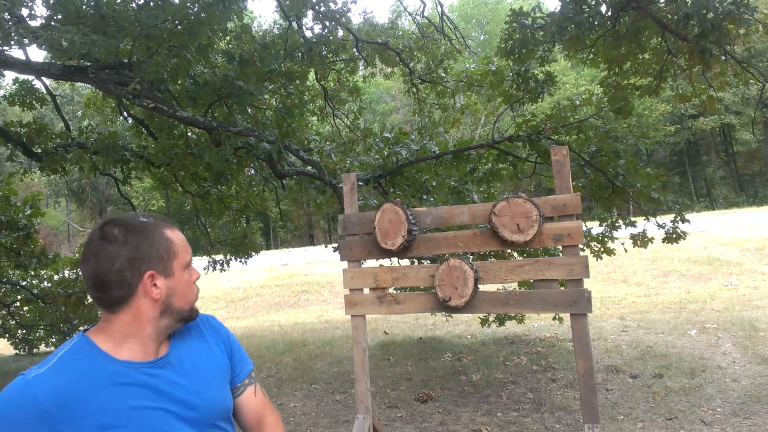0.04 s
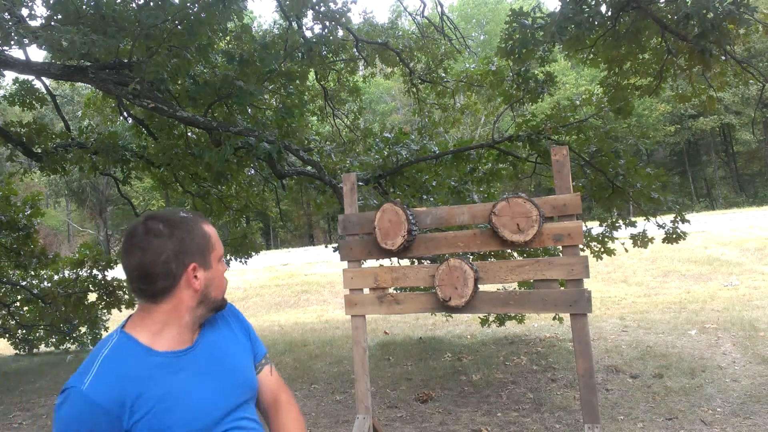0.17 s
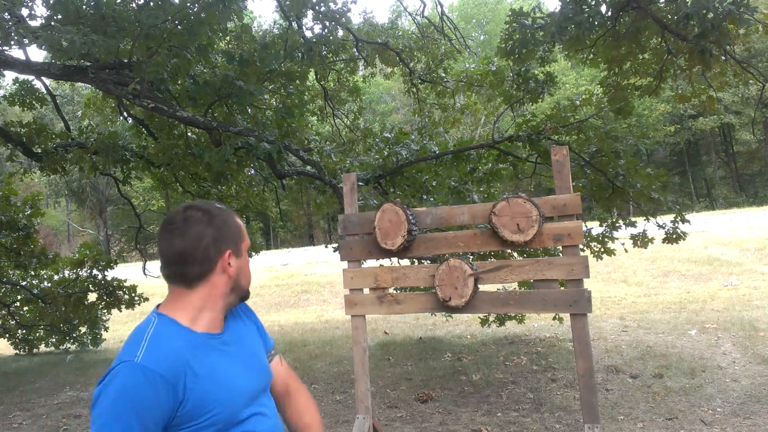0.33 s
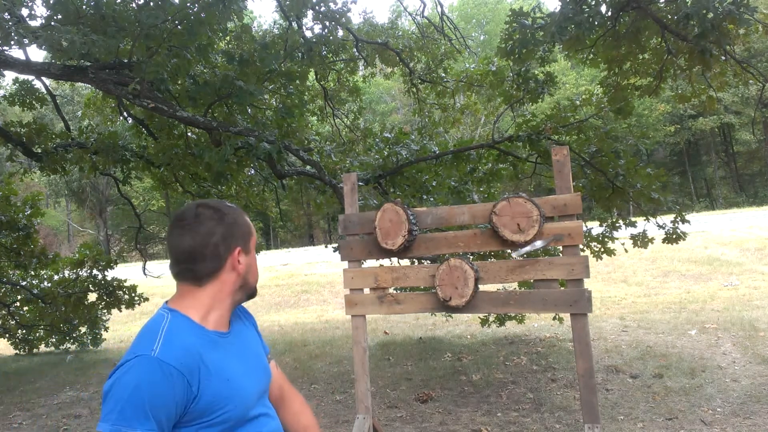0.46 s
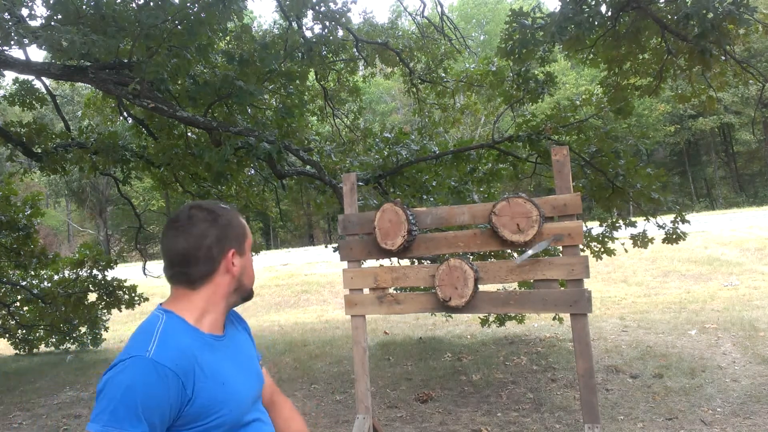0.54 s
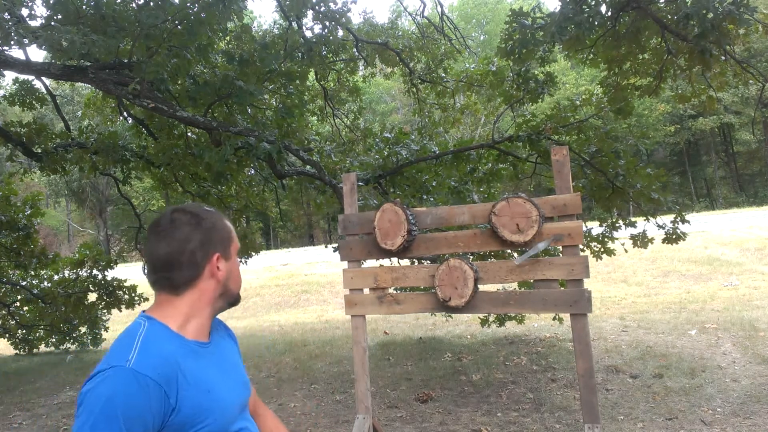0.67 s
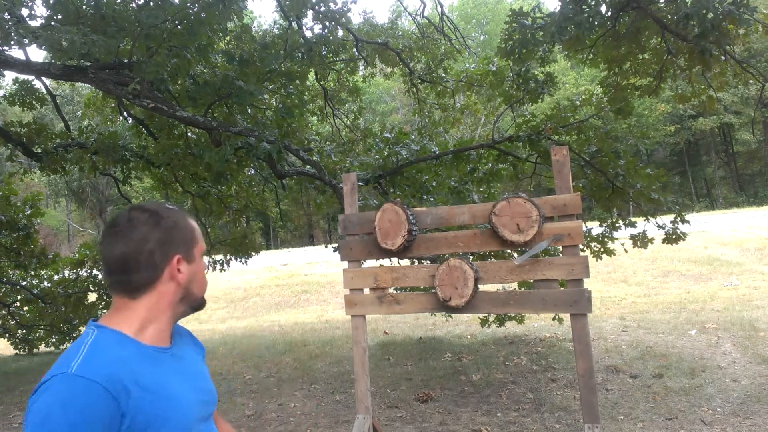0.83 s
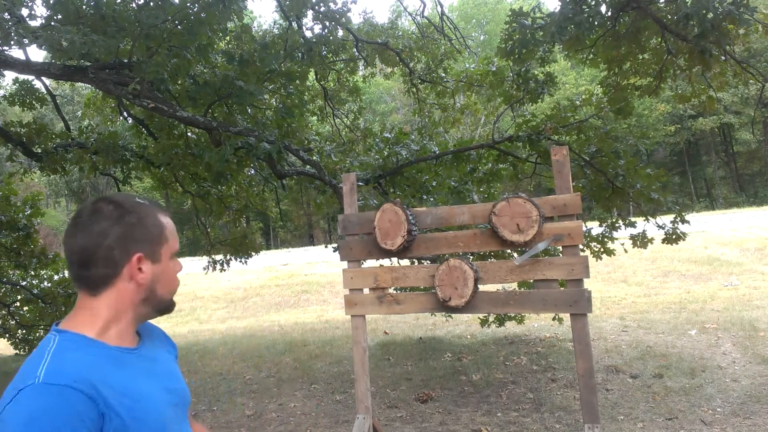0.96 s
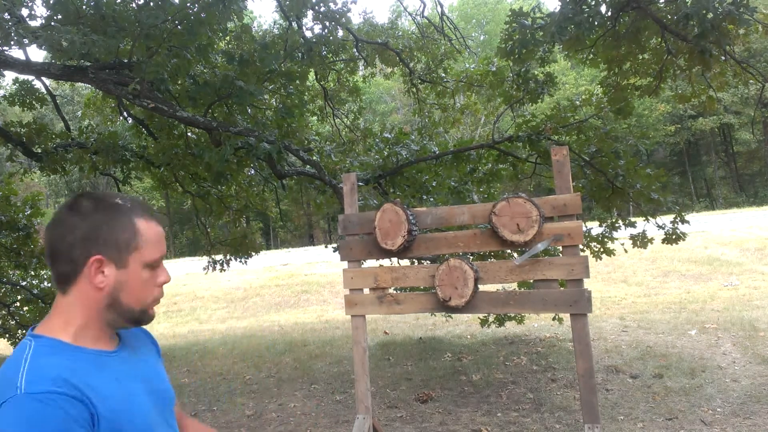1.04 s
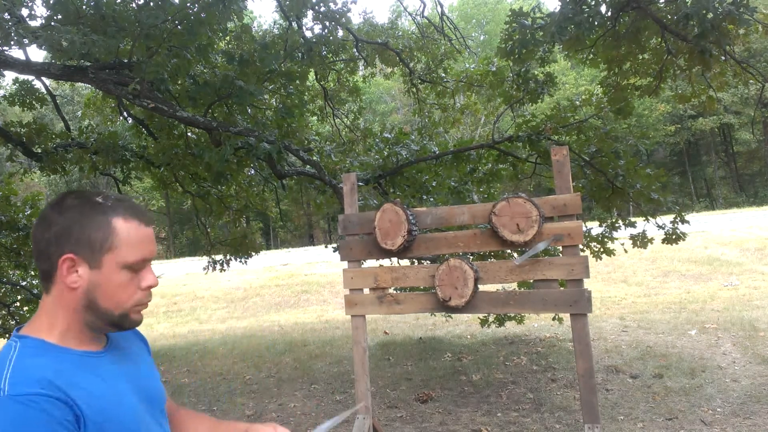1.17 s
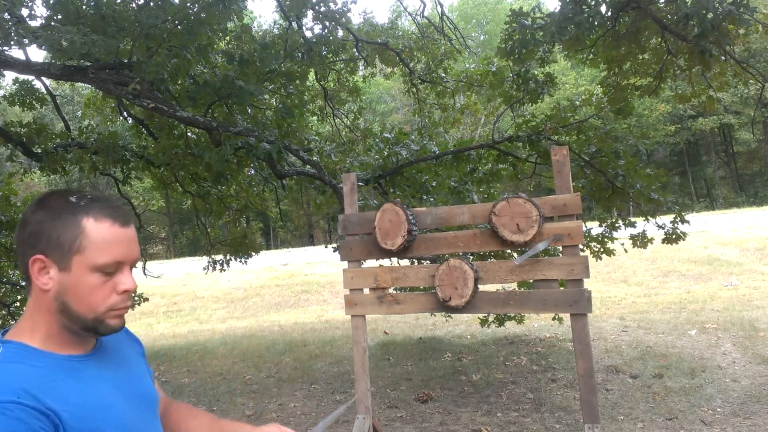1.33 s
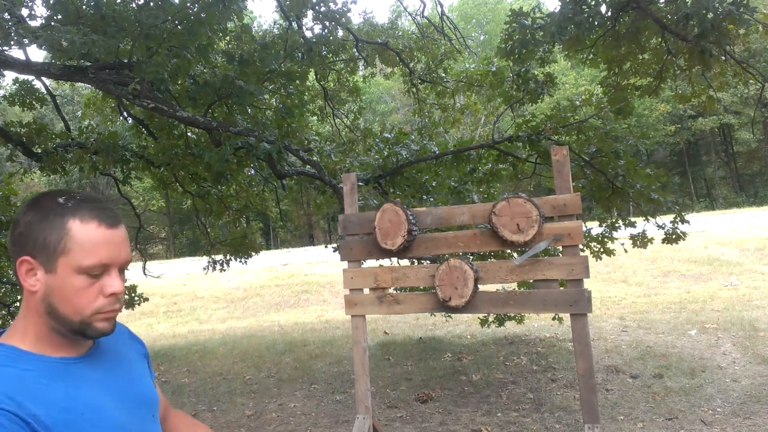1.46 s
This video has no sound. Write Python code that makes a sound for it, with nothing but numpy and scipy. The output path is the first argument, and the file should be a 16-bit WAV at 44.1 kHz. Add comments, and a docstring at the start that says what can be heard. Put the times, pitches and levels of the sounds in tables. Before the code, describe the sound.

Outdoors under trees, a steel knife strikes a wooden board with a sharp knock that rattles loose planks. Then, near the microphone, steel slides on steel with a short, quieter ring as another knife is drawn.

```python
"""A steel throwing knife thuds into a plank target under trees, heard on a stereo pair of microphones.
The point ticks, board and blade ring, loose planks clatter and the trees echo.
Close by, the next knife is drawn off the stack in the hand: steel scrapes on steel and the blades ring.
Behind it all lie a thin outdoor hiss and a low rumble."""
import sys
import numpy as np
from scipy import signal
from scipy.fft import rfft, irfft
from scipy.io import wavfile

SR = 44100
rng = np.random.default_rng(int(sys.argv[2]) if len(sys.argv) > 2 else 0)


def log_audio(samples):
    """Write samples as a 16-bit WAV file to the path given in sys.argv[1]."""
    # one column per channel
    frames = np.atleast_2d(samples).T
    # limit to full scale, then quantise
    limited = np.clip(frames, -1, 1)
    pcm = np.round(limited * 32767).astype(np.int16)
    wavfile.write(sys.argv[1], SR, pcm)


N = 66150

# colour of the open air (f/Hz, relative level/dB)
AIR_COLOUR = [(25, -8), (50, -5.5), (85, 2), (130, 3.5), (200, 2), (270, 1.5), (400, -3), (900, -5),
              (2500, -8.5), (4500, -5), (5600, -8), (7000, -15.5), (8500, -18), (10500, -22.5)]
# the air across the pair (f/Hz, left-right likeness, L-R/dB)
AIR_STEREO = [(59.6, -0.5, 6.5), (300, -0.25, -2), (600, -0.037, -2), (1900, 0.18, -2), (3430, -0.082, 4),
              (6000, -0.21, 8.5), (9940, 0.065, -4.5)]
# faint high tones in the background (f/Hz, level/dB)
WHINE_TONES = [(4215, -85.5), (4581, -82), (4947, -84), (5862, -82), (6600, -97)]
# steel ringing just after the throw (f/Hz, level/dB, t60/s, L-R/dB)
FLIGHT_MODES = [(3990, -69.5, 0.96, 6), (7770, -66, 0.38, -2.5), (9350, -69.5, .45, -6.5)]
# knives shifting in the hand (peak t/s, rise/s, fall/s, level/dB, centre f/Hz, spread/octaves)
HAND_RUBS = [(.008, 0.0064, 0.044, -62, 3180, 2.4), (.405, 0.015, 0.046, -64.5, 8300, 0.65),
             (.74, 0.046, 0.14, -73, 9000, 0.29), (0.876, 0.037, 0.011, -61, 7250, 1.23),
             (1.07, 0.035, 0.056, -67.5, 6960, 0.77)]
# colour of steel scraping steel (f/Hz, relative level/dB)
SCRAPE_COLOUR = [(600, -42), (1680, -10), (1880, 5.5), (2500, -2.5), (2900, 11.5), (3300, -3), (3900, 6),
                 (4400, 5.5), (4680, -2), (4950, 10), (5400, -0.5), (6400, 5.5), (7100, 0.5), (8400, 3.5),
                 (8850, -4), (9220, 8.5), (9550, -6), (10100, 2), (10700, -14)]
# the hand, close to the pair (f/Hz, left-right likeness, L-R/dB)
HAND_STEREO = [(1900, 0.34, -1), (3000, .4, -1.5), (4070, 0.23, 3), (5400, -0.15, 10.5), (6770, -0.55, -5),
               (7660, 0.061, -6.5), (8950, 0.094, -3), (10200, -0.16, -15.5)]
# tick of the point on wood (f/Hz, relative level/dB)
TICK_COLOUR = [(2000, -11.5), (5000, -18.5), (5900, -3.5), (6300, -25.5), (6900, -13.5), (7250, 8.5),
               (7700, -18.5), (8750, 4.5), (9100, -11), (9300, -4), (9600, -5), (10600, -16.5)]
# dense crack of the planks (f/Hz, relative level/dB)
CRACK_COLOUR = [(30, -42), (60, -24.5), (110, -16.5), (180, -12.5), (290, 2), (550, -8.5), (1200, -7),
                (1550, 1.5), (2300, -5.5), (2750, -23.5), (3350, -5), (3800, -14), (4500, -3.5),
                (4900, -26), (5900, -21), (6300, -26), (10000, -38.5)]
# the board with the knife in it (f/Hz, level/dB, t60/s, L-R/dB)
BOARD_MODES = [(118, -42, .2, -2), (290, -19.5, 0.029, 2.5), (371.4, -32, 0.19, -9), (448, -31, .22, -2),
               (596, -27, 0.19, -1), (672, -27.5, 0.032, -4.5), (987, -25.5, 0.055, -1),
               (1209, -19.5, .1, -7), (1414, -26.5, 0.14, -1), (1767, -22.5, 0.14, 7),
               (1876, -25.5, 0.044, 3.5), (2140, -23.5, 0.029, -6.5), (2340, -25.5, .11, -1),
               (2454, -23, 0.12, -4), (3258, -22, 0.035, 1.5), (4570, -16.5, 0.043, 18.5)]
# the stuck knife singing on (f/Hz, level/dB, t60/s, L-R/dB)
STUCK_MODES = [(3383, -43.5, 0.44, 4), (4260, -38.5, .15, 8.5), (4600, -42, .22, 10),
               (6840, -45.5, 0.12, -1), (8740, -45.5, .16, -6)]
# phase lead at the left microphone (f/Hz, lead/rad)
LEFT_LEAD = [(300, 3.0), (600, 2.6), (1200, 2.1), (2400, 1.9), (4600, 0.79)]
# lingering clatter of the frame (f/Hz, relative level/dB)
FRAME_COLOUR = [(30, -38), (60, -23.5), (100, -8), (190, -4.5), (380, 6), (550, -1.5), (780, -1),
                (1250, -1), (1600, -2.5), (2400, -9.5), (3000, -9.5), (4600, -13), (5000, -19),
                (6300, -23.5), (7200, -22), (9000, -21.5), (10400, -32)]
# loose planks knocking after the hit (t/s, level/dB)
PLANK_KNOCKS = [(0.2618, -23.5), (0.267, -48), (0.283, -38), (0.306, -43.5), (0.333, -55)]
# the target across the pair (f/Hz, left-right likeness, L-R/dB)
TARGET_STEREO = [(60, 0.34, 0), (264, -1.073, 4), (645, -0.83, 2), (1170, -0.73, 0.5), (2280, -.3, 4),
                 (3420, -0.038, -0.5), (4800, -0.12, 11), (5900, -1.2, 15), (7160, -0.1, -8.5),
                 (10000, 0.46, -5)]
# echo off the trees (f/Hz, relative level/dB)
ECHO_COLOUR = [(100, -8), (400, -8.5), (900, -4), (1300, 2), (1800, 2.5), (2800, -6), (3250, -7), (3430, 2),
               (3600, -9), (4600, -10), (6000, -17), (10000, -23.5)]
# the echo across the pair (f/Hz, left-right likeness, L-R/dB)
ECHO_STEREO = [(100, -1.1, 2.5), (1500, 0.54, -3), (4500, -0.05, 5.5), (9000, -0.077, -6)]
# blade sliding on blade (peak t/s, rise/s, fall/s, drive/dB, scrape level/dB, centre f/Hz, spread/octaves)
BLADE_SLIDES = [(.902, 0.013, 0.0096, -46.5, -38.5, 9800, 0.35),
                (0.923, 0.019, 0.01, -44.5, -37.5, 5320, 0.88),
                (0.942, 0.014, 0.018, -48.5, -54, 5150, 0.64),
                (0.994, 0.013, 0.039, -58.5, -56.5, 6960, 0.88)]
# the edge squealing as it slips free (peak t/s, rise/s, fall/s, drive/dB, centre f/Hz)
EDGE_SQUEALS = [(.962, .010, 0.0032, -40.5, 4370), (1.007, .008, .005, -40, 4400),
                (1.015, 0.015, .003, -42.5, 2900)]
# the hand-held blades (f/Hz, gain/dB, t60/s, L-R/dB)
BLADE_MODES = [(1873, 4.5, 0.1, -9), (2902, 0.5, 0.22, 0), (3753, -6.5, 0.098, 5), (4200, -10.5, 0.17, 36),
               (4340, -4, 0.12, 5), (4980, -2.5, .12, 16), (5200, -10.5, 0.37, 3), (5770, -12, 0.051, 28),
               (6556, 0, 0.1, -2.5), (7360, -7.5, 0.18, -26), (7760, -22, 0.081, 16),
               (8050, -3.5, 0.18, -9), (9028, -2.5, 0.32, -5.5), (9540, -15, 0.034, 15),
               (9820, -2, .2, -10), (10300, -19, 0.17, -7)]
# the drawn knife, once free (f/Hz, level/dB, t60/s, L-R/dB)
FREED_MODES = [(1200, -61, .3, -4), (1980, -66, 0.57, -2), (3900, -58, 0.25, 4), (6550, -62, 0.41, 2)]

HIT_S, BITE_RISE_S = .2249, 0.0017
LOADED_S = HIT_S + 0.001387  # the blade takes a moment to load the board


def undb(db):
    """Decibels to gain."""
    return 10 ** (np.asarray(db) / 20)


def across(table, hz, column=1):
    """One column of a table, read on a log-frequency axis."""
    rows = np.array(table, float)
    return np.interp(np.log(hz + 1e-9), np.log(rows[:, 0]), rows[:, column])


def focus(hz, centre_hz, octaves):
    """Bell-shaped weight around a frequency."""
    return np.exp(-.5 * (np.log2((hz + 1e-9) / centre_hz) / octaves) ** 2)


def noise(colour, stereo, band=None):
    """Coloured unit-level noise on the pair, optionally narrowed to a band (f/Hz, spread/octaves)."""
    hz = np.arange(N // 2 + 1) * SR / N
    mid, side = rfft(rng.standard_normal((2, N)))
    likeness = np.clip(across(stereo, hz), -.99, .99)
    sign = np.array([[1], [-1]])
    pair = mid * np.sqrt(1 + likeness) + sign * side * np.sqrt(1 - likeness)
    balance = undb(sign * across(stereo, hz, column=2) / 2)
    weight = focus(hz, *band) if band else 1
    out = irfft(pair * balance * undb(across(colour, hz)) * weight, N)
    return out / out.std()


def wander(rate_hz):
    """Smooth random drift of unit spread."""
    hz = np.arange(N // 2 + 1) * SR / N
    out = irfft(rfft(rng.standard_normal(N)) * np.exp(-.5 * (hz / rate_hz) ** 2), N)
    return out / out.std()


def struck(start, rise, t60):
    """Envelope of a blow: a quick rise and an exponential fall."""
    age = np.maximum(np.arange(N) / SR - start, 0)
    return np.minimum(age / rise, 1) * np.exp(-np.log(1000) * np.maximum(age - rise, 0) / t60)


def stroke(peak, rise, fall):
    """Pressure of one sliding contact: it swells and lets go."""
    late = np.arange(N) / SR - peak
    return np.exp(-.5 * (late / np.where(late < 0, rise, fall)) ** 2)


def pan(db):
    """Left and right gains at constant power."""
    gains = undb(np.array([[db], [-db]]) / 2)
    return gains / np.sqrt(np.mean(gains ** 2))


def ring(modes, start):
    """Decaying modes set off together, reaching the two microphones out of step."""
    age, out = np.arange(N) / SR - start, 0
    for hz, db, t60, pan_db in modes:
        lead = np.array([[across(LEFT_LEAD, hz)], [0]])
        tone = np.sin(2 * np.pi * (hz * age + rng.random()) + lead)
        out += undb(db) * pan(pan_db) * struck(start, BITE_RISE_S, t60) * tone
    return out


def outdoors(fade_db_per_s=1.9):
    """Open air: a slowly fading hiss, faint high tones to the left, a rumble that swells and sinks."""
    t = np.arange(N) / SR
    air_db = -64 - fade_db_per_s * (t - t.mean()) + 2 * wander(6)
    air = undb(air_db) * noise(AIR_COLOUR, AIR_STEREO)
    whine = sum(undb(db) * np.sqrt(2) * np.sin(2 * np.pi * hz * t + 1.2 * wander(5.86))
                for hz, db in WHINE_TONES)
    swell = np.exp(-.5 * ((t - 0.93) / 0.34) ** 2)
    rumble = undb(-68) * swell * noise(AIR_COLOUR, AIR_STEREO, band=(83, 0.41))
    return air + pan(6) * whine + rumble


def thrown_knife():
    """The steel rings faintly just after the throw."""
    return ring(FLIGHT_MODES, start=0)


def scraping(grain_db=2):
    """Close by, steel on steel hisses with a fine grain; once the blades tap together."""
    grain = undb(grain_db * wander(rate_hz=930))
    tap = undb(-51.5) * struck(.7262, rise=.001, t60=0.022)
    out = tap * noise(SCRAPE_COLOUR, HAND_STEREO, band=(4700, 0.75))
    for peak, rise, fall, *_, db, centre_hz, spread in HAND_RUBS + BLADE_SLIDES:
        hiss = noise(SCRAPE_COLOUR, HAND_STEREO, band=(centre_hz, spread))
        out += undb(db) * stroke(peak, rise, fall) * grain * hiss
    return out


def knife_hit():
    """At the target the point ticks, the planks crack, and board and stuck knife ring together."""
    tick = undb(-18.5) * struck(HIT_S, rise=0.00046, t60=0.03) * noise(TICK_COLOUR, TARGET_STEREO)
    crack = undb(-12.5) * struck(LOADED_S, BITE_RISE_S, t60=0.042) * noise(CRACK_COLOUR, TARGET_STEREO)
    return tick + crack + ring(BOARD_MODES + STUCK_MODES, LOADED_S)


def plank_clatter():
    """The blow leaves the frame clattering, and loose planks knock dully."""
    frame = undb(-22) * struck(LOADED_S, rise=0.0051, t60=0.22) * noise(FRAME_COLOUR, TARGET_STEREO)
    knocks = sum(undb(db) * struck(start, rise=0.00033, t60=0.024) for start, db in PLANK_KNOCKS)
    return frame + knocks * noise(CRACK_COLOUR, TARGET_STEREO, band=(493, 0.95))


def tree_echo():
    """The trees answer the hit with a soft, diffuse tail."""
    return undb(-47.5) * struck(LOADED_S, rise=.04, t60=1) * noise(ECHO_COLOUR, ECHO_STEREO)


def blade_ring(roughness=0.47, flutter_hz=69, mean_beat_hz=22.11, beat_depth=0.44):
    """Close by, slides feed the blades' modes roughly, squeals cleanly; fingers damp the upper ones."""
    t, out = np.arange(N) / SR, 0
    slides = [(undb(db) * stroke(peak, rise, fall), hz, spread)
              for peak, rise, fall, db, _, hz, spread in BLADE_SLIDES]
    squeals = [(undb(db) * stroke(peak, rise, fall), hz) for peak, rise, fall, db, hz in EDGE_SQUEALS]
    grip = undb(-380 * np.maximum(t - 1.018, 0))  # the hand closes: 380 dB/s
    for hz, db, t60, pan_db in BLADE_MODES:
        rub = sum(push * focus(hz, centre_hz, spread) for push, centre_hz, spread in slides)
        sing = sum(push * focus(hz, centre_hz, octaves=.04) for push, centre_hz in squeals)
        retained = np.exp(-2 * np.log(1000) / (t60 * SR))  # share of energy left after one sample
        swing = np.sqrt(signal.lfilter([1 - retained], [1, -retained], rub ** 2 + sing ** 2 + 1e-18))
        flutter = wander(flutter_hz) + 1j * wander(flutter_hz)
        rough = roughness * np.minimum(rub / swing, 1) * flutter
        phase, twin_phase, detune = rng.random(3)
        tone = np.exp(2j * np.pi * (hz * t + phase + np.array([[.2], [0]])))  # left microphone leads
        if hz > 3300:
            # near-twin blades beat against each other
            twin = np.exp(2j * np.pi * (mean_beat_hz * (.5 + detune) * t + twin_phase))
            tone *= grip * (1 + beat_depth * twin)
        out += undb(db) * pan(pan_db) * swing * np.real((1 + rough) * tone)
    return out


def freed_knife():
    """Clear of the stack, the drawn knife rings on softly."""
    return ring(FREED_MODES, start=1.006)


def scene():
    """Under the trees one knife flies and strikes; near the microphones the next is drawn."""
    throw = thrown_knife() + knife_hit() + plank_clatter() + tree_echo()
    hand = scraping() + blade_ring() + freed_knife()
    return outdoors() + throw + hand


def record(dry):
    """The recorder cuts the top steeply above 10450 Hz."""
    return signal.sosfilt(signal.ellip(10, .2, 80, 10450, fs=SR, output="sos"), dry)


dry = scene()
out = record(dry)
log_audio(out)
```